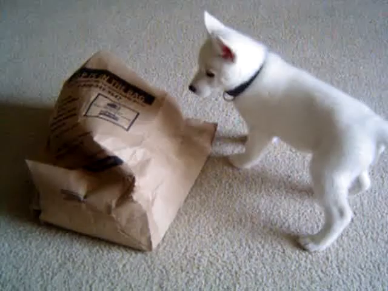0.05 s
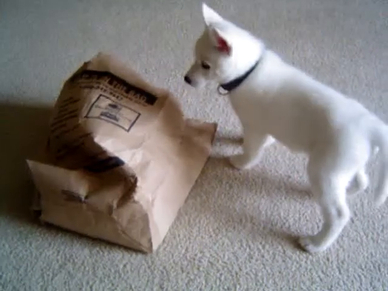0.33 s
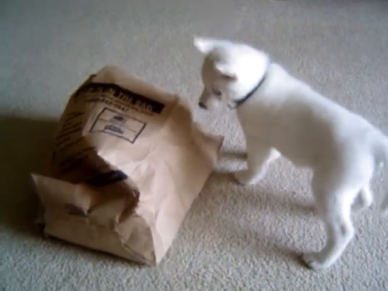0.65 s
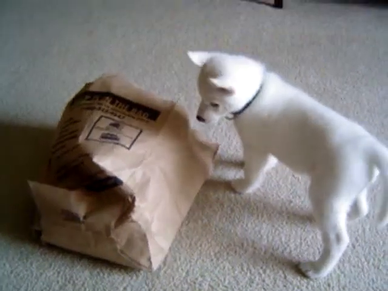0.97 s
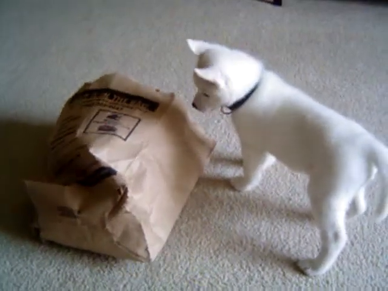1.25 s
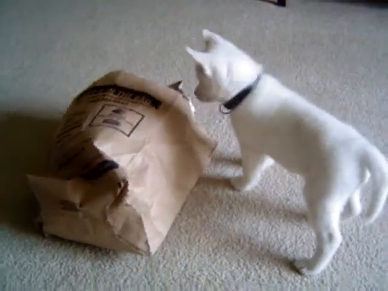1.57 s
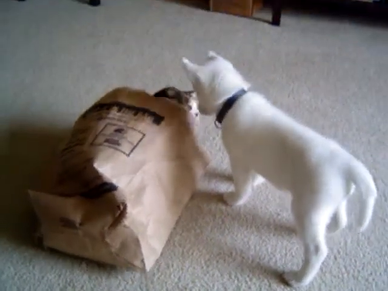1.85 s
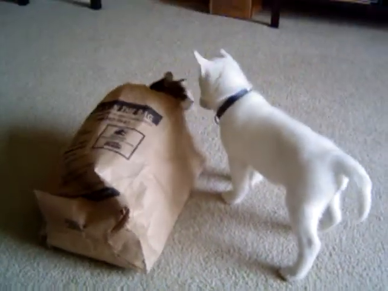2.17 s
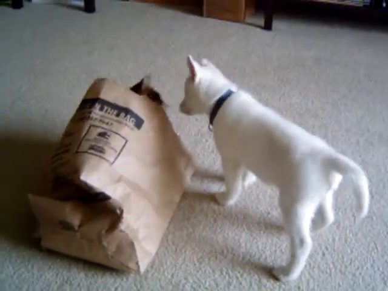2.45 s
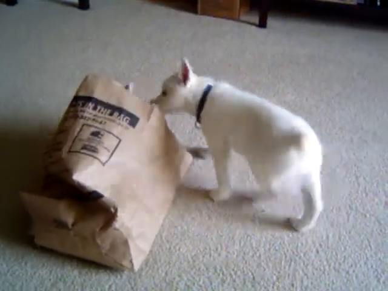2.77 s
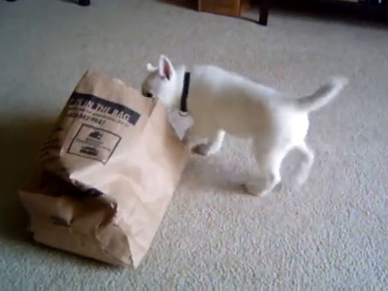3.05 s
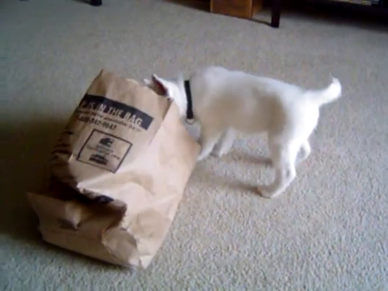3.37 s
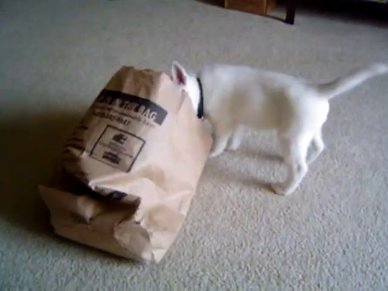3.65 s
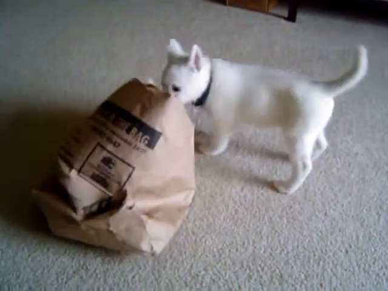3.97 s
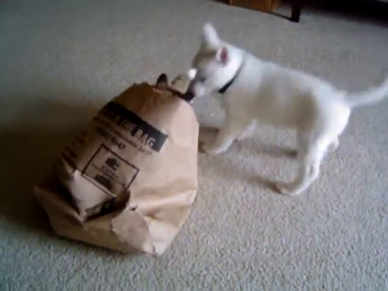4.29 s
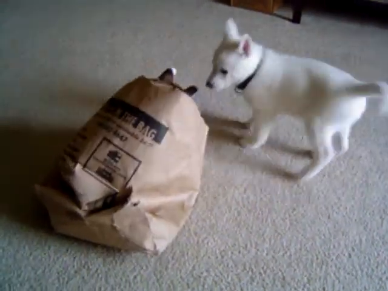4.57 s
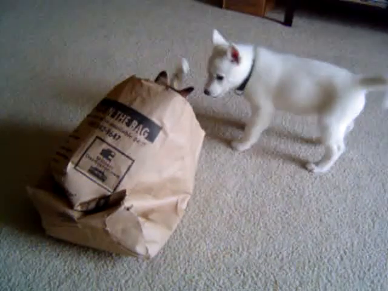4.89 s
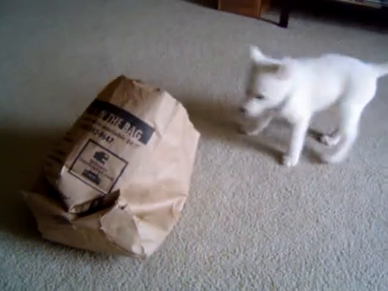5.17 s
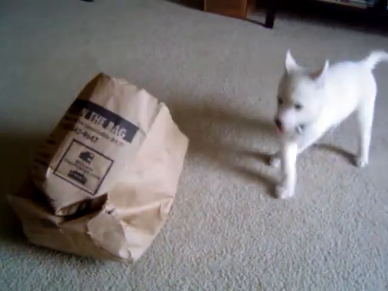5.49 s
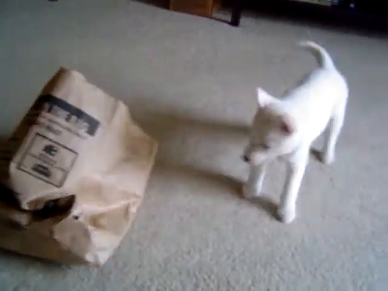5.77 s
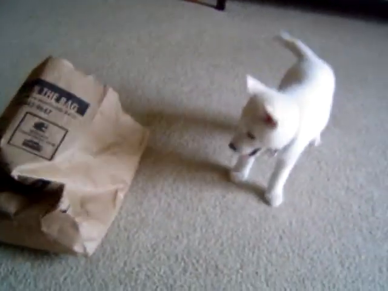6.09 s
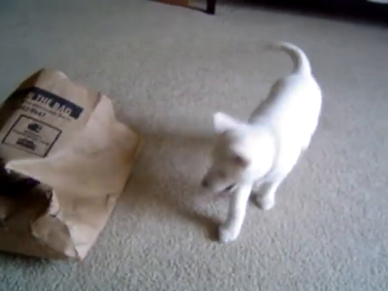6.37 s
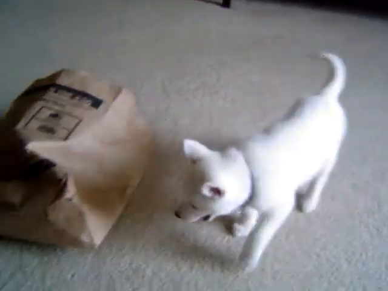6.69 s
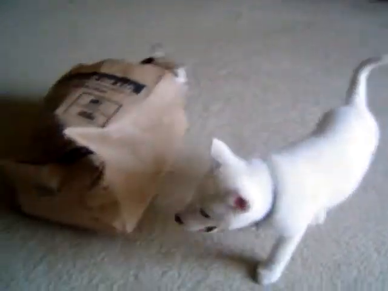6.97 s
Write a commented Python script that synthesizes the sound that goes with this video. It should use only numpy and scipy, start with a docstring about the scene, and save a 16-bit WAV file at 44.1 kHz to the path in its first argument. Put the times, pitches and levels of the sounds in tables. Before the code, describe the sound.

A puppy noses, bites and tugs at a large paper bag on a carpet. The stiff paper gives short, irregular snaps and crackles, with faint rustling and a soft sliding hiss between them. Near the middle, one side caves in with a loud crunch and a brief hollow thump, then the snaps grow sparser. One microphone picks it up in a small, quiet room with a faint steady hum.

```python
"""Short snaps of stiff paper: a puppy noses, bites and tugs at a large paper bag on a carpet.
One microphone in a small, quiet room hears each snap directly, then the room's answer.
Buckling creases ring the bag's panels; near the middle a side caves in with a crunch and a boom.
Between snaps the paper ticks, flexes and slides with a soft hiss. A faint steady hum lies behind it."""
import sys
import numpy as np
from scipy import signal
from scipy.fft import rfft, irfft, next_fast_len
from scipy.io import wavfile
from scipy.ndimage import uniform_filter1d

SR = 44100
rng = np.random.default_rng(int(sys.argv[2]) if len(sys.argv) > 2 else 0)


def waveform_to_disk(signal):
    """Save audio, clipped to [-1, 1], as 16-bit WAV at the path in sys.argv[1]."""
    frames = np.transpose(np.atleast_2d(signal))
    scaled = np.clip(frames, -1, 1) * 32767
    samples = np.round(scaled).astype(np.int16)
    wavfile.write(sys.argv[1], SR, samples)


N = 319284

# Creases that snap; thud and crack are relative to strength:
# start_s, strength_db, thud_db, thud_hz, crack_db, panel_hz, ring_db, fold_hz
CREASE_SNAPS = [(.006,-13.5,12,330,-18,500,20.5,1700),(.073,-3,13,196,-7,545,19,2550),(.083,-11.5,12,230,-14,715,12,1680),(.194,-7.5,16,261,-35,516,11.5,1880),(.326,-9.5,6.5,310,-14,1090,10.5,1530),(.567,-13,-4,378,-16,650,18,1600),(.593,-2,4.5,316,-1,650,15,3460),(.622,-13,13,400,-10,560,21.5,1900),(0.662,-7,16,222,-6.5,630,16.5,2700),(.726,3.5,10,288,-3,1170,13.5,2490),(.777,-4.5,13,393,-12,555,22,1510),(0.791,-3.5,-2,350,0.5,800,3,3920),(0.879,0,12,476,-33,1070,10.5,1620),(.887,11.5,5,453,-2,630,11,3000),(.894,3.5,4.5,475,-1.5,885,17.5,2920),(.934,3,3,408,-10,1130,5,1750),(.952,-7.5,-7,400,-18,680,20,1600),(1.06,-3.5,5,464,-4,477,7,1710),(1.099,4.5,6,393,4,730,15.5,1670),(1.11,-7,3,380,-3,900,7,3900),(1.277,6.5,6.5,530,0.5,2860,6.5,2030),(1.317,-7.5,3,400,1,900,3,1900),(1.355,-8.5,-1,400,-11,645,12,1870),(1.394,-8.5,7,259,-9,530,16,1550),(1.56,-1.5,4,384,-29,600,7.5,1560),(1.799,3.5,12,345,0,1280,15,2760),(1.954,-7,5,310,-34,710,13,1520),(1.983,-11,11.5,306,-23,836,9,1930),(2.079,-13.5,-4,467,-5,1140,15,1500),(2.436,-6.5,9,304,-12,330,16,1500),(2.505,5,-5,330,-0.5,3180,10.5,2470),(2.514,-6.5,2,400,6.5,3100,2,1600),(2.601,-20,10,400,-33,706,24,1500),(2.624,10,6.5,380,-3,700,13.5,2560),(2.638,-3.5,5.5,302,-13,620,14,1700),(2.677,-1.5,1,423,-8,800,4,2720),(2.793,-5,16,353,-11,990,15,1680),(2.819,8,4.5,258,-4,910,7,2880),(2.824,7.5,2,403,-7,616,13,1900),(2.89,6,-10,260,-4.5,1550,7.5,1950),(2.963,5,8.5,315,4,1130,19,2540),(2.992,1.5,11.5,293,-25,900,9.5,1470),(3.168,2.5,3,338,-3.5,2560,4,2100),(3.19,-7,8,300,-17,1250,9,1700),(3.22,7.5,6.5,288,-10.5,776,6.5,1500),(3.249,-3,8,242,-26,795,4,1700),(3.26,11,6,245,-5.5,800,4,1960),(3.269,12.5,-4,208,-2.5,750,-3,2400),(3.277,-1,-4,307,6,705,2,1700),(3.369,11,1.5,291,-1.5,1250,6,3600),(3.404,-2.5,10.5,410,-23,1290,14,1600),(3.487,-6,-2,510,-8,1380,10.5,1700),(3.548,-15,7,350,-14,820,14,1600),(3.633,-16,7,350,-13,880,14,1600),(3.685,-2.5,0,303,-8,905,10.5,2610),(3.746,-10,0,290,-19,1300,8,1690),(3.761,6,10,314,-1.5,1480,9,3050),(3.768,9,-13,415,-12,3100,10,1950),(3.775,17.5,-19,400,0,5330,7,4160),(3.782,16,4,418,4,1650,7.5,2810),(3.792,6,-2,300,2,1200,10,4800),(3.797,3,5,290,0,1100,3,3100),(3.808,12,6,300,-8,790,11.5,5000),(3.816,7,4,280,-7,1200,5,2600),(3.825,21.5,-37,365,-5.5,2800,10.5,3300),(3.828,11.5,7,370,5.5,3650,5,2960),(3.837,7,1.5,280,-7,1150,10,3600),(3.843,1.5,8,280,-2,900,13,3900),(3.858,5,0,320,5,1400,9,3600),(3.872,-1,6,350,-1,1000,0,3200),(3.885,12,-22,470,0,1290,10,3080),(3.899,11.5,-2,340,5.5,3300,4,4330),(3.91,-5,-3,300,-9,1300,4,4400),(3.92,-1,-5,350,-3,1000,6,2800),(3.97,11,-7,436,-5.5,1820,6,3170),(4.092,7,-11,400,-3.5,730,14,1700),(4.151,6.5,-0.5,403,-3,920,8.5,1900),(4.168,-3.5,1,330,1.5,1510,4,2470),(4.319,-3,-1,428,-4,1350,10.5,1700),(4.433,-10.5,8,400,-12,570,13.5,1600),(4.526,-3,5,400,-23,840,19.5,1480),(4.569,-3,5,390,-2.5,880,15.5,1510),(4.598,0.5,2,407,-7,640,14.5,1680),(4.848,11,-4.5,224,-3,670,15.5,2780),(4.851,9,-7,260,-9,710,8,1470),(4.875,-3.5,2,300,-4,950,13,2700),(4.897,-2,1,300,-9,620,16,1690),(4.961,2.5,-7,280,-12.5,1160,8,1860),(4.972,-9.5,0,300,-19,800,14,1480),(5.155,-13.5,19.5,236,-2,390,12.5,1560),(5.311,-11,14,245,-31,605,15.5,1610),(5.514,0,-2,242,-13,750,-2,1520),(5.527,5.5,1.5,213,-14,1270,-4,2570),(5.642,-0.5,7.5,260,-22,825,9,1500),(5.685,6.5,-2,250,-12.5,1370,6,2360),(5.935,-11,6,500,-20,544,15.5,1540),(6.001,-7.5,0,505,-14,780,11,1470),(6.237,-19,11,350,-14,820,13,1600),(6.263,-16,6,350,-12,670,18,1600),(6.282,-7,5,485,-14,870,14,1840),(6.633,-5.5,2,422,-16,870,5,1490),(6.815,-9.5,9,405,-31,557,18,1660),(6.975,8,-5.5,280,0,2560,8.5,3340),(7.181,-3.5,3,280,-38,816,11,1670),(7.213,2,12,313,-17,635,10.5,1500)]
# The bag's side gives a little, then caves in: time_s, relative_db
CRUMPLE_CURVE = [(3.19, -61), (3.25, -44), (3.285, -34), (3.34, -47), (3.45, -87), (3.74, -90),
                 (3.757, -70), (3.772, -18), (3.795, -25.5), (3.845, -31), (3.875, -38), (3.92, -47),
                 (3.98, -34), (4.1, -46)]
# Low thumps, from a caving wall pushing air out or, at the start, a paw stepping down: start_s, puff_db,
# boom_db, pitch_hz
LOW_THUMPS = [(0.072, -38, -51, 170), (3.224, -55, -45, 189), (3.26, -43, -23.5, 196.6),
              (3.778, -30, -23, 220), (3.826, -16.5, -29, 203)]
# Crisp ticks, perhaps the puppy's teeth or collar: start_s, level_db
HARD_TICKS = [(6.168, -13.5), (6.333, -6.5), (6.343, -2.5)]
# Spells of nosing and tugging, in relative levels: start_s, length_s, crinkles_db, flex_db
PUPPY_TUGS = [(0.0, 0.2, -58, -48), (0.58, 0.17, -52, -62), (0.764, 0.28, -64, -43.5),
              (1.054, 0.6, -68, -47), (1.882, 0.22, -52, -52), (2.354, 0.44, -54, -53),
              (2.808, 0.25, -40, -46), (3.16, 0.23, -42, -40.5), (3.735, 0.466, -40.5, -43),
              (4.166, 0.55, -55, -50.5), (5.493, 0.22, -47.5, -57), (5.907, 0.44, -62, -51.5),
              (6.975, 0.3, -54, -50)]
# Paper sliding on carpet and fur: middle_s, length_s, relative_db
SLIDE_STROKES = [(0.14, 0.41, -55), (0.384, 0.55, -66), (0.685, 0.44, -52), (0.956, 0.61, -56),
                 (1.403, 0.8, -53), (1.756, 0.46, -57), (2.026, 0.51, -55.5), (2.438, 0.41, -51),
                 (2.696, 0.33, -69), (2.948, 0.64, -54), (3.25, 0.7, -56.5), (4.023, 0.58, -52.5),
                 (4.407, 0.34, -60.5), (6.18, 0.18, -59), (6.48, 0.54, -60.5), (7.213, 0.44, -57.5)]
# Tone of the ticks, flexing walls and sliding paper at the microphone: frequency_hz, gain_db
TICK_SPECTRUM = [(200, -42), (900, -7), (1900, -1.5), (2600, 6), (3100, -5), (3600, -3), (4800, -6),
                 (6000, -11), (10000, -17)]
FLEX_SPECTRUM = [(60, -28), (130, -12.5), (200, -1.5), (320, 2), (550, -8), (900, -10), (2000, -23.5),
                 (5000, -47)]
SLIDE_SPECTRUM = [(300, -12), (900, -36), (2000, 6), (3200, 6), (5000, 3), (7000, 1), (9000, -0.5),
                  (10500, -5.5)]
# How long the room rings: frequency_hz, t60_s
ROOM_DECAY = [(200, 0.2039), (530, 0.273), (1400, 0.18), (3700, .5), (9000, 1.6)]
# Tone of the room's reflections: frequency_hz, gain_db
ROOM_SPECTRUM = [(80, 11), (190, 2), (330, 1), (600, 6.5), (1500, 1.5), (3000, -18.5), (4500, -25),
                 (8000, -29)]
# Standing waves of the room: pitch_hz, width_hz, gain_db
STANDING_WAVES = [(200, 14, 7), (278, 70, 6), (388, 9.4, 4.5), (690, 88, -1), (844, 160, 3.5)]
# Air noise in the still room: frequency_hz, gain_db
AIR_SPECTRUM = [(15, -46), (25, -24.5), (132, -2.5), (219, -1.5), (411, -9), (467, -8), (616, -4),
                (717, -7), (1020, -10), (1160, -12.5), (1870, -13), (2470, -16), (2950, -16), (8500, -25),
                (10400, -26.5), (13500, -63), (22000, -120)]
# Background hum and faint whine: pitch_hz, width_hz, level_db
HUM_BANDS = [(121, 3.1, -64.5), (201.3, 5.1, -63), (488, 12, -62), (1047, 13, -63.5), (1700, 18, -65.5),
             (1920, 19, -65.5), (3140, 180, -71), (5400, 25, -74.5), (5500, 310, -71)]

BURST_SAMPLES = 2048
BURST_HZ = np.fft.rfftfreq(BURST_SAMPLES, 1 / SR)


def snaps(ceiling_s=0.013, ceiling_db=-25, carry_hz=780):
    """Each buckling crease drives the paper; mainly the large, low panels ring into the room."""
    direct, reflected = np.zeros(N), np.zeros(N)
    for start_s, db, thud_db, thud_hz, crack_db, panel_hz, ring_db, fold_hz in CREASE_SNAPS:
        fizz_db = crack_db - 21 + 0.92 * db  # harder, sharper snaps fizz more
        burst = buckle(decay_s=0.00118, rise_s=0.0006)
        slips = ripple_spectrum(splinters(bag_echoes(burst)))
        carried_db = 0.5 * ring_db / (1 + (panel_hz / carry_hz) ** 2)
        colours = (paper_colour(thud_db, thud_hz, crack_db, fizz_db, panel_hz, ring, fold_hz)
                   for ring in (ring_db, carried_db))
        to_mic, to_room = (irfft(slips * minimum_phase(db + colour)) for colour in colours)
        add(direct, start_s, to_mic)
        add(direct, start_s + ceiling_s * rng.uniform(0.9, 1.1), gain_of(ceiling_db) * to_mic)
        room_db = -3 - 0.13 * db  # gentle snaps reach the microphone more by way of the room
        add(reflected, start_s, gain_of(room_db) * room(to_room))
    return direct + standing_waves(reflected)


def buckle(decay_s, rise_s):
    """A crease gives way in milliseconds of tiny slips: a burst with even spectrum and unit energy."""
    t = np.arange(BURST_SAMPLES) / SR
    shape = swell(t, rise_s, decay_s)
    burst = rng.standard_normal(BURST_SAMPLES) * shape
    for _ in range(4):  # flatten the spectrum, then restore the envelope
        spectrum = rfft(burst)
        burst = irfft(spectrum / (abs(spectrum) + 1e-12)) * np.minimum(2 * shape / shape.max(), 1)
    return burst / np.linalg.norm(burst)


def bag_echoes(burst, echo=0.67, dull_hz=4500):
    """The snap bounces between the bag's walls and the floor, duller each time, combing its spectrum."""
    out, bounced = burst.copy(), burst
    pole = np.exp(-2 * np.pi * dull_hz / SR)
    for delay_s in np.linspace(0.000921, 0.0042, 3) * rng.uniform(0.75, 1.227, 3):
        add(out, delay_s, echo * rng.choice([-1, 1]) * np.exp(-delay_s / 0.0084) * bounced)
        bounced = signal.lfilter([1 - pole], [1, -pole], bounced)
    return out / np.sqrt(1 + 1.22 * echo ** 2)


def splinters(burst, level_db=-17, within_s=0.032, count=9):
    """Lesser cracks run on along the crease after it gives way, fading into a rustle."""
    out = burst.copy()
    for lateness, size in rng.random((count, 2)):
        crack = buckle(decay_s=0.00074, rise_s=0.00023)
        thin = signal.lfilter([1], [1, -0.85], np.diff(crack, prepend=0))  # bass cut
        add(out, 0.0041 + lateness * within_s, gain_of(level_db) * size * (1 - lateness / 2) * thin)
    return out


def ripple_spectrum(burst, broad_hz=650, flattening=0.78):
    """Spectrum of a burst that keeps its fine ripple but leaves the broad colour to the paper."""
    spectrum = rfft(burst)
    broad_power = uniform_filter1d(abs(spectrum) ** 2, int(broad_hz / BURST_HZ[1]))
    broad_db = 10 * np.log10(broad_power + 1e-9)
    return spectrum * minimum_phase(-flattening * broad_db)


def paper_colour(thud_db, thud_hz, crack_db, fizz_db, panel_hz, ring_db, fold_hz):
    """One snap's spectrum in dB: a wall thuds, a panel rings, the stiff fold cracks and fizzes."""
    bass = [(thud_hz / 7, thud_db - 33), (thud_hz / 2.86, thud_db - 19.5),
            (thud_hz / 1.47, thud_db - 8.5), (thud_hz, thud_db - 3)]
    treble = [(650, 0.64), (1400, -0.61), (3250, crack_db - 1.5),
              (4600, 0.74 * crack_db + 0.7 * fizz_db), (6500, fizz_db - 4.5), (10000, fizz_db - 14.5)]
    # paper is heavily damped: a louder panel spreads wider instead of ringing longer
    panel_width = 0.045 * np.sqrt(max(ring_db, 7))
    wall_db = 6 / (1 + (np.log((BURST_HZ + 1) / thud_hz) / 0.22) ** 2)
    panel_db = ring_db * bell(panel_hz, panel_width)
    fold_db = 7 * bell(fold_hz, width=0.046)
    # the panel cancels with the wall and with the fold, midway between their notes
    valleys_db = 0.11 * ring_db * bell(np.sqrt(thud_hz * panel_hz), panel_width)
    valleys_db += 3 * bell(np.sqrt(panel_hz * fold_hz), width=0.033)
    return curve_at(bass + treble, BURST_HZ) + np.max([wall_db, panel_db, fold_db], axis=0) - valleys_db


def crumple(crunch_db=-3, cracks_db=-6):
    """A whole side folds: creases crunch in clumps, and sharper cracks break out when it folds fastest."""
    time_s, db = np.transpose(CRUMPLE_CURVE)
    level = gain_of(np.interp(np.arange(N) / SR, time_s, db, left=-120, right=-120))
    creases = impulses(per_s=6000) * flutter(depth_db=3, rate_hz=140)
    crunch = coloured(creases, [(60, -11), (300, 13), (850, 16.5), (2000, 15.5), (3400, 11),
                                (5200, 6.5), (7000, -18), (10000, -20.5)])
    cracks = crackle(per_s=1600, spread_db=2, crack_db=1, fizz_db=-8, ring_db=7, panels=10)
    cracks *= np.sqrt(level / level.max())
    return level * (gain_of(crunch_db) * crunch + gain_of(cracks_db) * cracks)


def booms(puff_s=0.0022, room_db=-8):
    """A caving wall shoves air out, or a paw steps down, and the air left in the bag booms briefly."""
    out, t = np.zeros(N), np.arange(SR // 4) / SR
    for start_s, puff_db, boom_db, pitch_hz in LOW_THUMPS:
        puff = gain_of(puff_db) * (1 - t / puff_s) * np.exp(-t / puff_s)
        tone = np.sin(2 * np.pi * pitch_hz * t)
        boom = gain_of(boom_db) * tone * swell(t, rise_s=0.0049, decay_s=0.014)
        add(out, start_s, puff + boom)
        add(out, start_s, gain_of(room_db) * room(boom))
    return out


def ticks(room_db=-2):
    """Small hard things click together: all treble, with no thud of the bag."""
    out = np.zeros(N)
    for start_s, db in HARD_TICKS:
        burst = splinters(buckle(decay_s=0.0017, rise_s=0.0011), level_db=-13)
        tick = irfft(rfft(burst) * minimum_phase(db + curve_at(TICK_SPECTRUM, BURST_HZ)))
        add(out, start_s, tick)
        add(out, start_s, gain_of(room_db) * room(tick))
    return out


def settling(below_snap_db=56):
    """Strained fibres around a crease go on crinkling finely after a snap, more so after a hard one."""
    t, power = np.arange(SR // 3) / SR, np.zeros(N)
    shape = swell(t, rise_s=0.027, decay_s=0.057)
    for start_s, strength_db, *_ in CREASE_SNAPS:
        add(power, start_s, (gain_of(strength_db - below_snap_db) * shape) ** 2)
    grains = impulses(per_s=1500) * pop_sizes(spread_db=5.5)
    colour = [(300, -29), (1200, 4.5), (2500, 6), (4500, 0), (6500, -15.5), (10000, -20)]
    return np.sqrt(power) * coloured(grains, colour)


def crinkles(trim_db=-5, room_db=-1.5):
    """Little folds pop one by one, louder while the puppy works the bag."""
    pops = crackle(per_s=90, spread_db=1, crack_db=-6, fizz_db=-27, ring_db=9, panels=20)
    direct = pops * tugging("crinkles", idle_db=-60) * gain_of(trim_db)
    return direct + gain_of(room_db) * room(direct)[:N]


def crackle(per_s, spread_db, crack_db, fizz_db, ring_db, panels):
    """Small creases pop at random on many panels, each with its own note; an rms of one."""
    out = np.zeros(N)
    for panel_hz in np.geomspace(400, 2600, panels):
        thud_hz, fold_hz = rng.uniform(260, 480), rng.uniform(1800, 4200)
        colour = paper_colour(-7.5, thud_hz, crack_db, fizz_db, panel_hz, ring_db, fold_hz)
        burst = buckle(decay_s=0.001, rise_s=0.00045)
        pop = unit_rms(irfft(rfft(burst) * minimum_phase(colour)))
        triggers = pop_sizes(spread_db) * (rng.random(N) < per_s / panels / SR)
        out += signal.oaconvolve(triggers, pop)[:N]
    return unit_rms(out)


def flexing(trim_db=-3):
    """The limp walls of the bag bulge and sag with a lumpy, hollow rustle."""
    push = rng.standard_normal(N) * flutter(depth_db=3, rate_hz=12)
    return coloured(push, FLEX_SPECTRUM) * tugging("flex", idle_db=-58.5) * gain_of(trim_db)


def tugging(layer, idle_db, attack_s=0.0069, release_s=0.024):
    """Each tug builds up, holds and lets go; in between, the paper keeps settling faintly."""
    t, power = np.arange(N) / SR, gain_of(idle_db) ** 2
    for start_s, length_s, crinkles_db, flex_db in PUPPY_TUGS:
        db = crinkles_db if layer == "crinkles" else flex_db
        attack = np.clip((t - start_s) / attack_s, 0, 1)
        release = np.exp(-np.maximum(t - start_s - length_s, 0) / release_s)
        power = power + (gain_of(db) * attack * release) ** 2
    return np.sqrt(power)


def sliding(trim_db=3, pointedness=1.7):
    """Fibres catch and slip as the paper slides: a hiss that swells and fades with each stroke."""
    t, power = np.arange(N) / SR, np.zeros(N)
    for middle_s, length_s, db in SLIDE_STROKES:
        arch = np.maximum(1 - (2 * (t - middle_s) / length_s) ** 2, 0) ** pointedness
        power += (gain_of(db) * arch) ** 2
    slips = rng.standard_normal(N) * flutter(depth_db=2, rate_hz=140)
    return coloured(slips, SLIDE_SPECTRUM) * np.sqrt(power) * gain_of(trim_db)


def room(sound, delay_s=0.00089, build_s=0.00033, samples=20000):
    """Sparse, dull reflections thicken as they fade, different for every place on the bag."""
    t = np.arange(samples) / SR
    echoes_per_s = 1500 + 60000 * t
    taps = rng.standard_normal(samples) * (rng.random(samples) < echoes_per_s / SR)
    taps *= 1 - np.exp(-np.maximum(t - delay_s, 0) / build_s)
    taps *= 1 + 0.2 * np.exp(-t / 0.0057)  # the nearest surfaces answer strongest
    hz, time_s, bands = signal.stft(taps, SR, nperseg=256)
    bands *= gain_of(-60 * time_s / curve_at(ROOM_DECAY, hz)[:, None])
    bands *= gain_of(curve_at(ROOM_SPECTRUM, hz))[:, None]
    _, tail = signal.istft(bands, SR, nperseg=256)
    return signal.fftconvolve(sound, tail / np.linalg.norm(taps * gain_of(-60 * t / 0.32)))


def standing_waves(sound):
    """A few low notes of the room ring on."""
    return sound + sum((gain_of(db) - 1) * signal.lfilter(*signal.iirpeak(hz, hz / width_hz, SR), sound)
                       for hz, width_hz, db in STANDING_WAVES)


def room_tone(air_db=-51):
    """Steady air noise with a few narrow, wavering bands of hum."""
    t, hum = np.arange(N) / SR, np.zeros(N)
    for pitch_hz, width_hz, db in HUM_BANDS:
        phase = 2 * np.pi * pitch_hz * t
        band = drift(width_hz / 2) * np.cos(phase) + drift(width_hz / 2) * np.sin(phase)
        hum += gain_of(db) * unit_rms(band)
    return hum + gain_of(air_db) * coloured(rng.standard_normal(N), AIR_SPECTRUM)


def gain_of(db):
    """Decibels to amplitude."""
    return 10 ** (np.asarray(db) / 20)


def unit_rms(x):
    """Scales to an rms of one."""
    return x / np.sqrt(np.mean(x ** 2) + 1e-20)


def add(mix, start_s, sound):
    """Mixes a sound in at its start time."""
    part = mix[max(round(start_s * SR), 0):][:len(sound)]
    part += sound[:len(part)]


def swell(t, rise_s, decay_s):
    """An envelope that rises and dies away exponentially."""
    return (1 - np.exp(-t / rise_s)) * np.exp(-t / decay_s)


def curve_at(points, hz):
    """Reads (frequency_hz, value) points on a log-frequency axis."""
    points_hz, values = np.transpose(points)
    return np.interp(np.log(hz + 1), np.log(points_hz + 1), values)


def bell(centre_hz, width):
    """A bell curve of height one on a log-frequency axis."""
    return np.exp(-0.5 * (np.log((BURST_HZ + 1) / centre_hz) / width) ** 2)


def coloured(x, colour):
    """Filters x by (frequency_hz, gain_db) points; an rms of one."""
    size = next_fast_len(len(x))
    gains = gain_of(curve_at(colour, np.fft.rfftfreq(size, 1 / SR)))
    return unit_rms(irfft(rfft(x, size) * gains, size)[:len(x)])


def minimum_phase(db):
    """The spectrum of the promptest pulse that has these band levels."""
    log_gain = np.log(gain_of(np.maximum(db, -100)))
    mirrored = np.concatenate([log_gain, log_gain[-2:0:-1]])
    return np.exp(np.conj(signal.hilbert(mirrored)))[:len(db)]


def drift(rate_hz):
    """Random wandering, mostly slower than rate_hz; an rms of one."""
    size = next_fast_len(N)
    rolloff = 1 + (np.fft.rfftfreq(size, 1 / SR) / rate_hz) ** 4
    return unit_rms(irfft(rfft(rng.standard_normal(size)) / rolloff, size)[:N])


def flutter(depth_db, rate_hz):
    """A gain that wavers at random."""
    return gain_of(depth_db * drift(rate_hz))


def impulses(per_s):
    """Unit clicks of either sign at random times."""
    return rng.choice([-1, 1], N) * (rng.random(N) < per_s / SR)


def pop_sizes(spread_db):
    """Random gains: many small, a few large."""
    return gain_of(spread_db * np.minimum(rng.exponential(1, N), 3))


def scene():
    """The bag on the carpet and the room around it, at one microphone."""
    bag = snaps() + settling() + ticks() + crumple() + booms() + crinkles() + flexing() + sliding()
    return (bag + room_tone())[None]


def record(dry, peak_limit=0.8, cutoff_hz=10080):
    """The loudest snaps are rounded off softly, then the top treble is cut."""
    rounded = peak_limit * np.tanh(dry / peak_limit)
    lowpass = signal.firwin(601, cutoff_hz, window=("kaiser", 8), fs=SR)
    return signal.oaconvolve(rounded, lowpass[None], "same")


dry = scene()
out = record(dry)
waveform_to_disk(out)
```